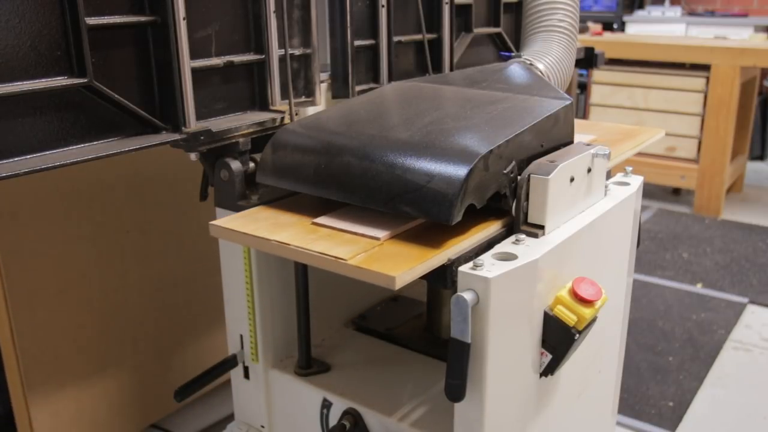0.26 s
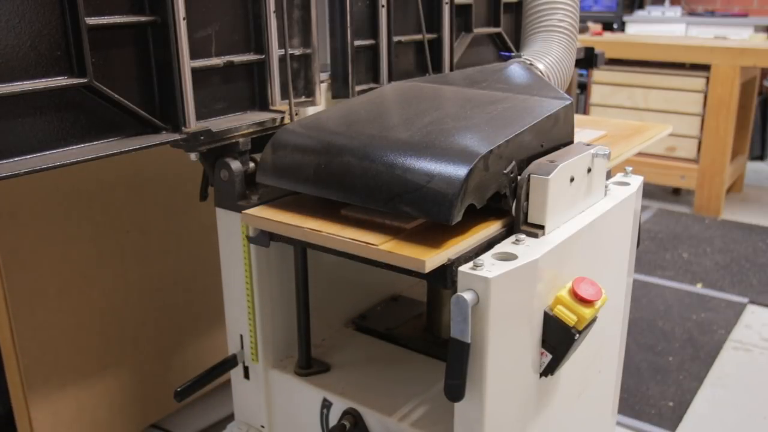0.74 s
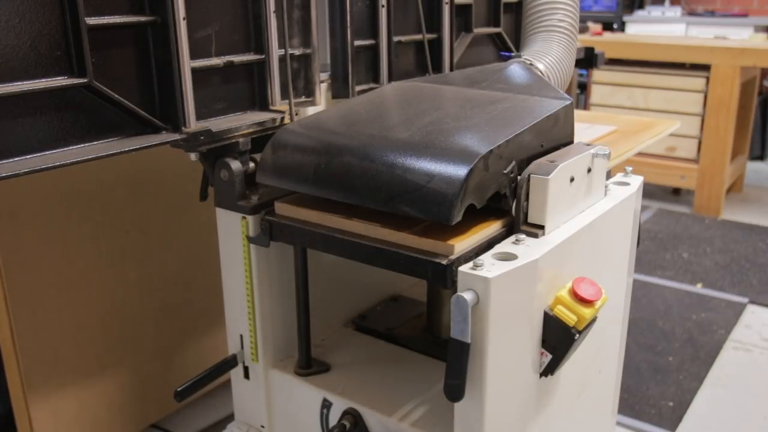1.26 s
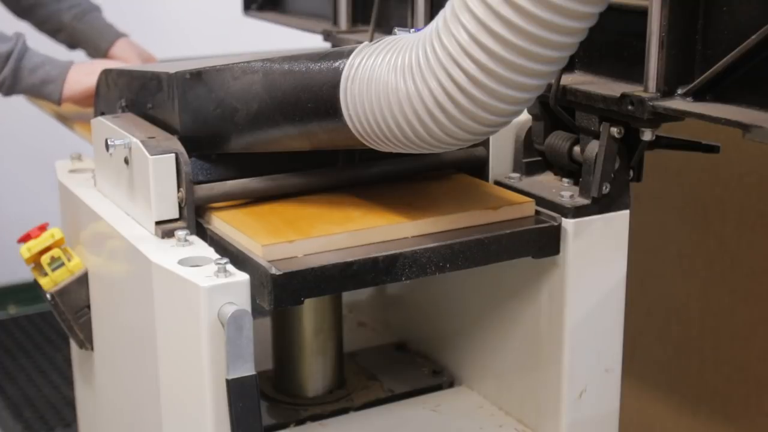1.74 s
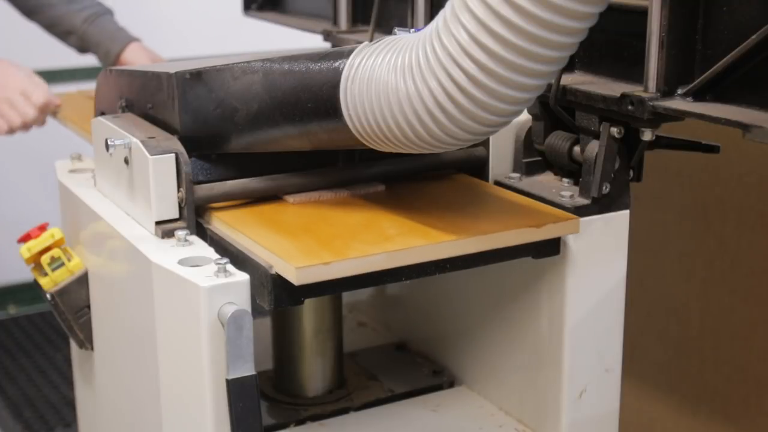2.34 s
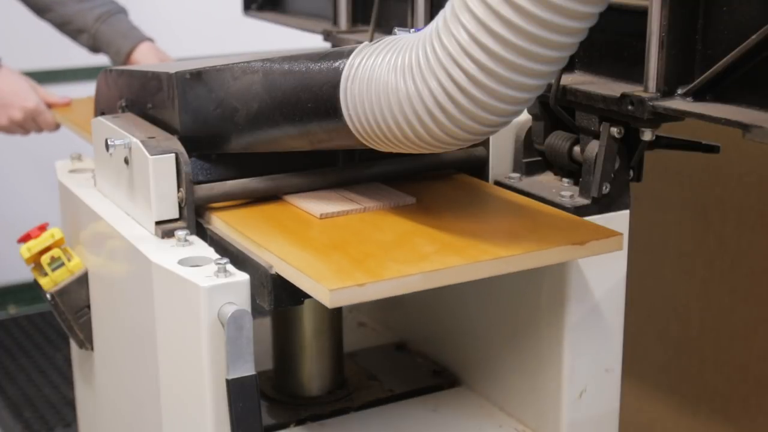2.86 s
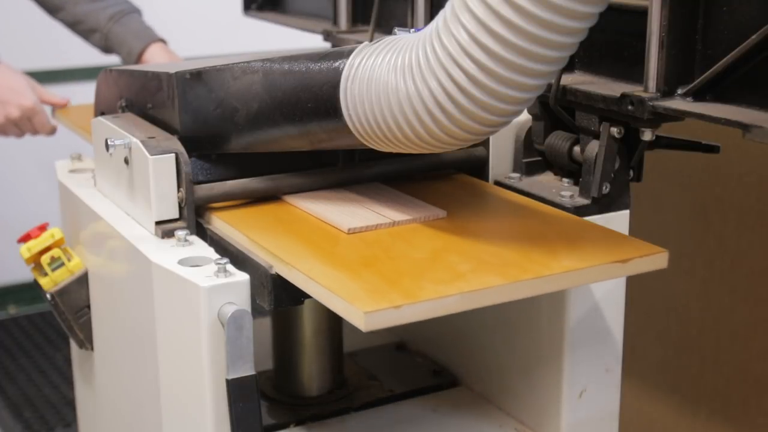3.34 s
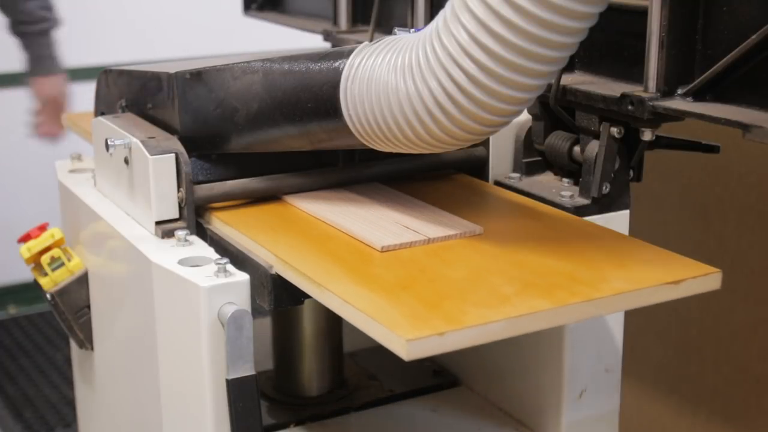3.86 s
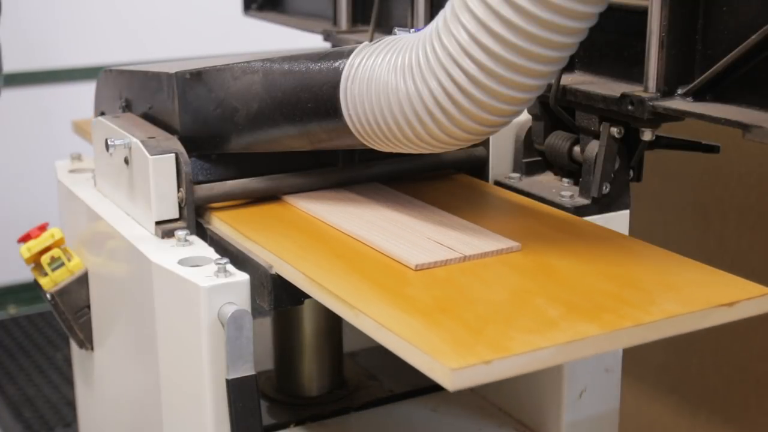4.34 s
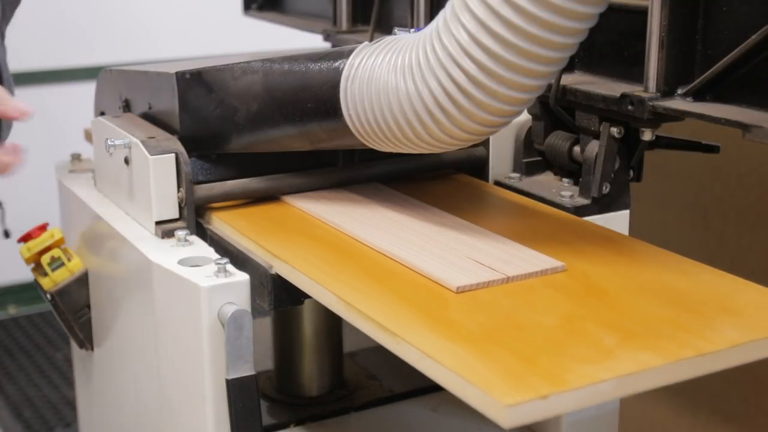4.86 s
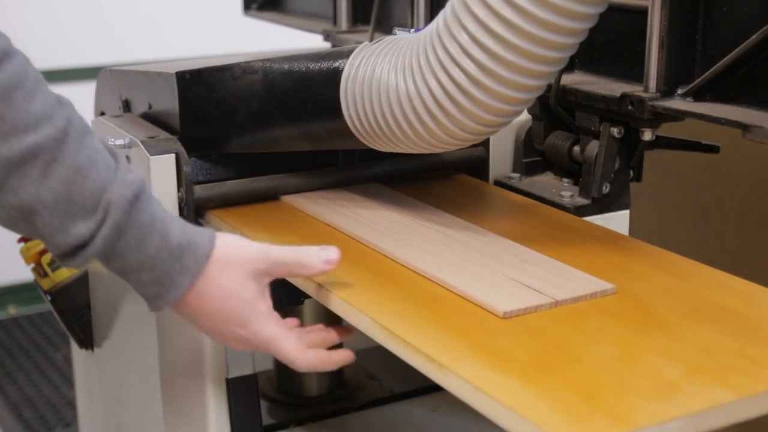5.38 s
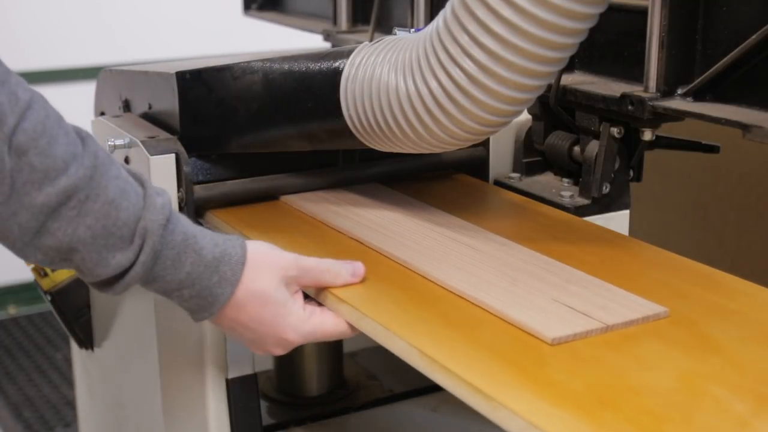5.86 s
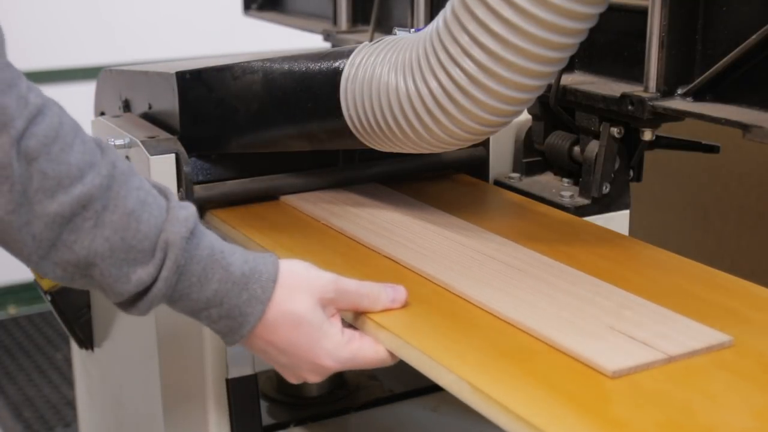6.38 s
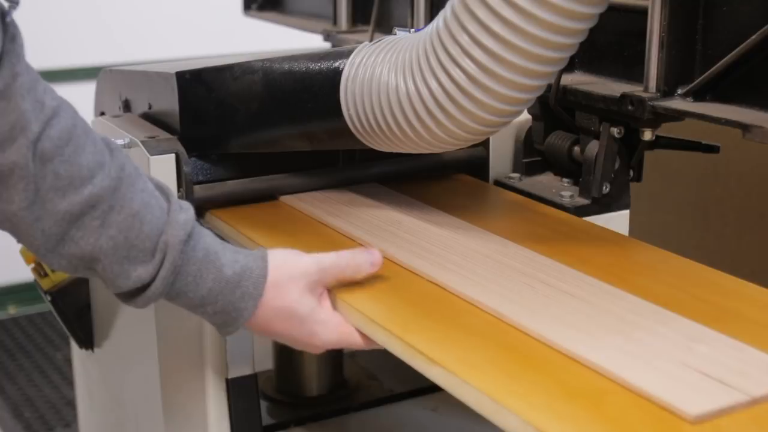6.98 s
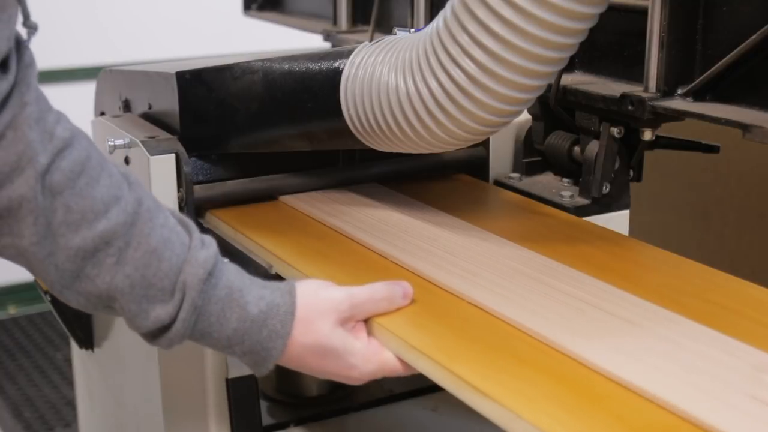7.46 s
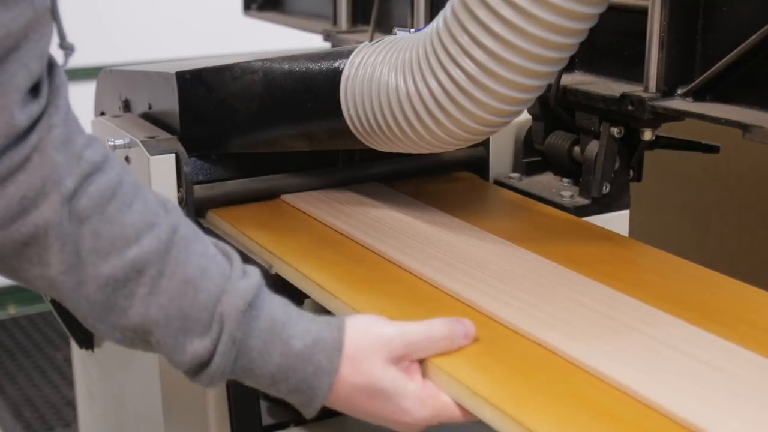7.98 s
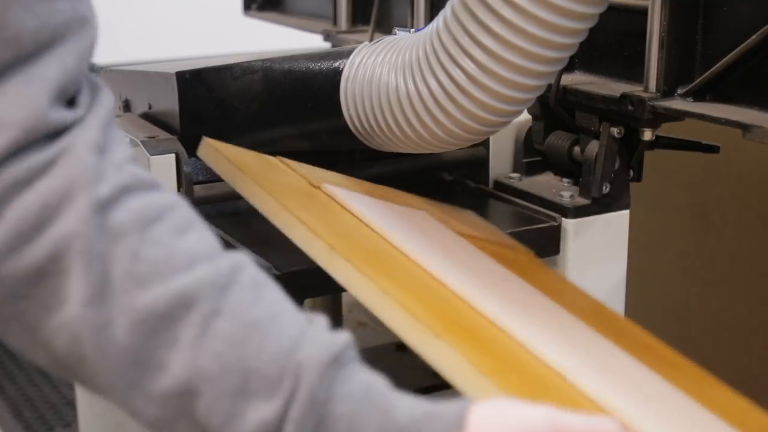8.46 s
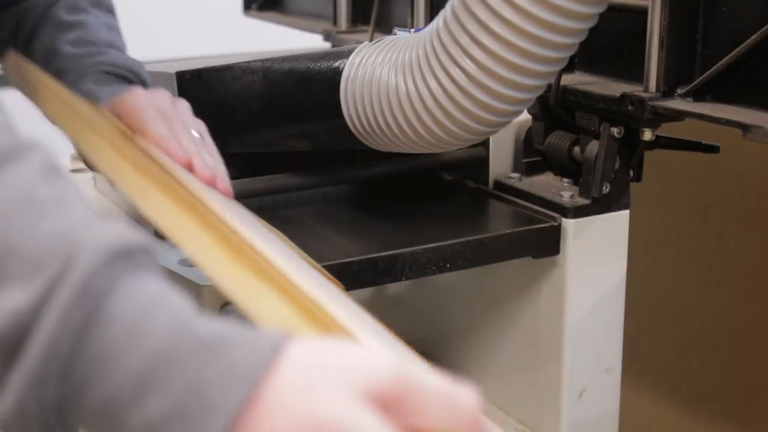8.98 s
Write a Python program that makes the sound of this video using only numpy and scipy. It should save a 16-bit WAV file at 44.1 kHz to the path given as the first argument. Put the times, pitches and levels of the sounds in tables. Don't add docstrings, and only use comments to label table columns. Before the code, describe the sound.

From the start a thickness planer is cutting, heard close at the infeed: a loud, dense buzz around 345 Hz with strong bright overtones, chip hiss and low motor rumble. At 1.5 s the position jumps to the outfeed with a faint thump; the tone turns thinner and sharper, and hiss brightens. A woody snap at 1.8 s marks the strip's nose catching under the roller. Until 6.8 s the whine holds nearly steady in pitch while individual overtones swell and fade. At 6.85 s the tail snaps free, fluttering, then squeals upward from 7.15 s. At 7.3 s cutting stops abruptly, leaving a short ring and room reverberation. Block and extractor fan hum slowly beat over suction air, sinking near 8.5 s and gradually growing louder until about 9.2 s. Soft board knocks land at 7.85, 8.15 and 8.3 s, with a tiny tick at 8.9 s.

```python
import sys
import numpy as np
from scipy import signal
from scipy.fft import rfft, irfft, next_fast_len
from scipy.io import wavfile
from scipy.ndimage import uniform_filter1d, map_coordinates

SR = 44100
rng = np.random.default_rng(int(sys.argv[2]) if len(sys.argv) > 2 else 0)


def unload_audio(sound):
    columns = np.transpose(np.atleast_2d(sound))
    steps = np.round(np.clip(columns, -1, 1) * 32767)
    wavfile.write(sys.argv[1], SR, steps.astype(np.int16))


def undo_db(level):
    steps = np.asarray(level, float) / 20
    return 10 ** steps


N = 406599

KNIVES, SHAFT_HZ = 4, 86.2
TOP_ORDER, STEP = 160, 1024
LEAVES_S = 7.3
# start_s, level_db
CUT_DEPTH = [(0, -3), (.8, -0.5), (1.49, -1.5), (2.2, -0.5), (3.3, -1), (4.8, 0), (5.7, -1), (6.2, 1),
             (7.1, -0.5), (7.28, 1.5)]
GRIP_STARTS = [
    0,
    1.5,
    1.79,
    2.05,
    2.65,
    4.4,
    6.85,
    7.14,
]


def along(points, hz):
    f, v = np.transpose(points)
    return np.interp(np.log(hz + 1), np.log(f + 1), v)


def curves(rows, s=None):
    at, *cols = np.transpose(rows)
    when = np.arange(N) / SR if s is None else s
    return [np.interp(when, at, c) for c in cols]


def unit(x):
    return x / np.sqrt(np.mean(np.abs(x) ** 2) + 1e-20)


def bump(x, centre, width):
    return np.exp(-((x - centre) / width) ** 2)


def filtered(x, response):
    m = next_fast_len(N + SR // 2)
    return irfft(rfft(x, m) * response(np.fft.rfftfreq(m, 1 / SR)), m)[..., :N]


def rush(spectrum, patchy_db):
    z = signal.stft(rng.standard_normal(N), nperseg=512)[2]
    field = uniform_filter1d(uniform_filter1d(rng.standard_normal(z.shape), 6, 0), 12, 1)
    x = signal.istft(z * undo_db(patchy_db * unit(field)), nperseg=512)[1][:N]
    return unit(filtered(x, lambda hz: undo_db(along(spectrum, hz))))


def tone(turns, db, unsteady_db):
    sway = map_coordinates(rng.standard_normal(80), [np.linspace(0, 79, N)], order=1)
    return np.sqrt(2) * undo_db(db + unsteady_db * sway) * np.sin(2 * np.pi * turns)


def cutting(s):
    let_go_s = .035
    return np.clip((LEAVES_S + let_go_s - s) / let_go_s, 0, 1) ** 1.6


def shaft():
    # start_s, rate_hz
    loaded = [(0, 342.9), (1.495, 342.7), (1.5, 344.5), (2.3, 344.3), (2.9, 345.0), (7.0, 345.4),
              (7.2, 345.9), (7.3, 348)]
    # start_s, rate_hz
    unloaded = [(7.45, 348.2), (7.7, 349.1), (7.95, 349.75), (8.2, 349.95), (9.22, 350.0)]
    # tug_rate_hz, swing_hz of the knife rate
    tugs = [(3.1, .2), (5.3, .27), (8.9, .3), (14.3, .33)]
    now = np.arange(N) / SR
    tug = sum(swing * np.sin(2 * np.pi * rate * now + rate) for rate, swing in tugs) * cutting(now)
    return np.cumsum(curves(loaded + unloaded)[0] + tug) / (KNIVES * SR)


def strip_levels(s, order, stage):
    # knife_multiple, level_db
    infeed = [(1, 7), (2, 1.5), (3, -1.5), (4, 4.5), (5, 3), (6, -2), (7, -2), (8, -2.5), (9, 1), (10, 3.5),
              (11, -4.5), (12, -29), (13, -12.5), (14, -26), (15, -5.5), (16, -12), (17, -33), (18, -18),
              (19, -10), (20, -12)]
    nose_free = [(1, -1), (2, -9.5), (3, -17.5), (4, -18), (5, 2.5), (6, 6), (7, -8), (8, -3.5), (9, -1),
                 (10, -2.5), (11, -4), (12, -4), (13, -11), (14, -15)]
    nose_caught = [(1, 0), (2, -34), (3, -9.5), (4, -9), (5, 1), (6, -6.5), (7, -5), (8, -5), (9, -1),
                   (10, -1.5), (11, 0), (12, -13), (13, -6.5), (14, -6.5), (15, -16), (16, -15)]
    nose_pressed = [(1, 0), (2, -14), (3, -10), (4, -8.5), (5, 4.5), (6, -8), (7, 5), (8, -10), (9, -1.5),
                    (10, 0.5), (11, -5), (12, -6), (13, -5), (14, -10), (15, 0), (16, -7)]
    held = [(1, 0), (2, -17.5), (3, -1.5), (4, -3), (5, -7), (6, -13), (7, -8), (8, -3), (9, -8), (10, 4.5),
            (11, 0.5), (12, -6), (13, -4), (14, -13), (15, -8), (16, -15), (17, -14), (18, -5), (19, -11.5),
            (20, -11), (21, -7), (22, -15), (23, -9.5), (24, -14), (25, -16.5), (26, -34), (27, -15.5),
            (28, -24), (29, -19), (30, -40)]
    held_late = [(1, 0), (2, -12.5), (3, -0.5), (4, -3.5), (5, -4), (6, -9), (7, -10.5), (8, 1.5), (9, -13),
                 (10, 4), (11, 4), (12, -5), (13, -10.5), (14, -19), (15, -14), (16, -21), (17, -24),
                 (18, -6.5), (19, -19), (20, -13), (21, -26), (22, -34), (23, -15), (24, -27)]
    tail_free = [(1, -5), (2, 1.5), (3, -1), (4, -27), (5, 3), (6, -10), (7, -3), (8, 6), (9, -8), (10, -1),
                 (11, -4), (12, -6), (13, -11), (14, -11)]
    tail_last = [(1, -14), (2, -5), (3, -2), (4, -5.5), (5, -0.5), (6, -10), (7, -5), (8, -3.5), (9, -1.5),
                 (10, -3), (11, -6), (12, -0.5), (13, -7), (14, -5), (15, -5), (16, -7), (17, -6),
                 (18, -15)]
    grip_db = [-2.5, 2.5, 2.5, 0.5, -1, -0.5, -1, 2.5]
    # pitch_hz, level_db
    uneven = [(60, -76), (260, -12.5), (430, -17.5), (520, -20.5), (900, -38), (1500, -18.5), (3000, -20),
              (4500, -14.5), (6500, -15.5), (9000, -19), (12000, -31.5), (14000, -29)]
    uneven_db = [-3.5, -4.5, -2.5, 1, 1, .5, -1, -9]
    order_bias_db = [0, 3.5, -4, -1]
    # shaft_order, extra_db
    hood_orders = [(13, 10), (14, 13.5), (17, 5.5), (18, 17), (21, -1), (22, 9.5), (25, 8), (15, 0),
                   (31, 6.5), (33, 5.5), (34, -12), (35, 13), (37, 1.5), (49, -7), (63, -13), (65, 2),
                   (74.06, 6.5), (42, 3), (51, -3), (77, 7)]
    base = along(uneven, order * SHAFT_HZ) + np.take(order_bias_db, order % KNIVES)
    base = base + rng.normal(0, 1.8, TOP_ORDER)
    db = base + np.take(uneven_db, stage)[:, None]
    for k, extra_db in hood_orders:
        db[:, round(k) - 1] += extra_db
    grips = [infeed, nose_free, nose_caught, nose_pressed, held, held_late, tail_free, tail_last]
    for k, table in enumerate(grips):
        multiple, level = np.transpose(table + held[len(table):])
        column = KNIVES * np.round(multiple).astype(int) - 1
        db[np.ix_(stage == k, column)] = level + grip_db[k]
    span = (stage == 4) | (stage == 5)
    db[span] = uniform_filter1d(db[span], SR // STEP, 0)
    db[s > 1.85] = uniform_filter1d(db[s > 1.85], size=5, axis=0, mode='nearest')
    return db


def place_levels(order, stage):
    # shaft_order, extra_db
    infeed_orders = [(3, 6), (9, 4), (15, -4), (17, 8), (19, -4), (21, 16), (22, -8), (23, 6), (25, -12),
                     (27, -5), (31, -9), (34, 4), (43, -6), (52, 4), (67, -6), (76, -3), (77, 6), (81, 4),
                     (84, -6), (92, -10)]
    # shaft_order, extra_db
    outfeed_orders = [(3, -2), (5, 2), (15, 6), (21, 4), (26, 5), (29, 3), (31, 3), (33, 2), (34, 8),
                      (37, 4), (43, 3), (47, 3), (51, 3), (52, 4), (54, -4), (55, 2), (56, 3), (58, -4),
                      (61, 2), (67, -6), (69, -3), (75, -2), (81, 3), (89, 3), (93, 3), (97, -3)]
    db = np.zeros((len(stage), len(order)))
    for here, favoured in ((stage == 0, infeed_orders), (stage > 0, outfeed_orders)):
        k, extra_db = np.transpose(favoured)
        db[np.ix_(here, k - 1)] += extra_db
    return db


def strip_modes(s, order, stage):
    # centre_s, shaft_order, level_db, half_length_s
    passing = [(1.53, 16, 12, .04), (1.53, 12, 6, .04), (1.53, 14, 6, .04), (1.6, 8, -12, .02),
               (1.1, 28, -5, .4), (1.75, 36, -4, .15), (2.4, 8, 5, .15), (4, 8, 6, .12), (4.5, 8, 4, .1),
               (5.25, 8, -6, .15), (6.79, 8, -8, .05), (3.4, 12, -5, .2), (4.9, 12, -3, .5),
               (6.9, 12, -4, .1), (2.8, 28, 12, .13), (3.6, 28, 4, .2), (4.4, 28, -6, .2),
               (4.3, 32, -4, .4), (5.2, 32, -3, .25), (6.72, 32, -7, .1), (2.35, 36, -8, .15),
               (5.6, 36, 4, .35), (4.7, 44, -3.5, .6), (5.8, 44, 10, .13), (6.45, 44, -9, .35),
               (3.55, 48, -7, .15), (4.6, 48, -9, .2), (2.35, 60, -10, .3), (3.85, 60, -5, .3),
               (4.9, 64, 9, .15), (5.7, 80, -6, .5), (2.2, 84, -9, .45), (2.2, 92, -7, .35),
               (5.65, 92, -7, .3), (6.25, 72, -4, .3), (7.1, 72, 8, .1), (5.7, 17, -12, 1.1),
               (5.3, 3, -7, .4), (7, 3, -12, .35), (5.3, 88, 6, .3), (6.4, 84, 5, .3), (6.7, 56, 5, .15),
               (4.3, 16, 4, .12), (5.1, 16, -5, .1), (7.05, 8, -6, .2), (7, 28, -3, .15),
               (5.5, 40, -2, 1.2), (2.4, 20, -2.5, .5), (1.77, 24, -5, .06), (5, 72, 2.5, 1.3),
               (5, 52, 1.5, 1.3), (6.75, 64, -7, .12), (7.27, 16, 3, .04), (7.2, 44, 4, .05),
               (1.735, 24, 9, .04), (1.6, 16, 5, .15), (1.7, 28, 5, .25), (1.62, 72, 2, .15),
            (2.85, 28, 7, .12), (2.55, 20, -2, .15), (3.25, 52, 2.5, .2), (3.9, 52, 2, .3),
            (4.35, 52, 4, .15), (6.1, 52, 4, .7), (4.9, 44, -3.5, .5), (5.55, 40, -3, .2),
            (6.15, 40, -4, .15), (7.12, 8, -5, .12), (7.06, 12, -4, .03), (7.13, 24, 6, .09),
            (7.16, 16, 4, .04), (7.31, 12, -13, .035), (7.32, 20, -8, .025), (7.32, 36, -7, .02),
            (7.32, 44, -7, .03), (7.32, 48, -11, .04), (7.32, 56, -6, .04), (1.81, 20, -6, .02),
            (2.1, 20, -3, .15), (5.4, 28, -3.5, .3), (5.85, 64, -7, .15), (3.8, 64, -6, .2),
            (6.85, 64, -5, .25), (.1, 16, 4, .13)]
    # centre_s, knife_multiple, level_db, half_length_s
    swells = [(1.12, 3, 5.5, 0.34), (1.15, 5, -14, 0.27), (1.3, 6, 3, 0.2), (1.76, 5, 9, 0.019),
              (2.114, 6, 13.5, 0.11), (2.415, 5, 8, 0.11), (2.57, 7, -41, 0.27), (2.79, 9, 10, 0.27),
              (3.07, 18, 9, 0.49), (3.2, 8, 7, 0.26), (3.5, 4, 4, 0.16), (3.36, 5, 9.5, 0.29),
              (4.2, 4, -9, 0.23), (4.69, 5, 6, 0.62), (5.3, 7, 12, 0.85), (5.84, 11, -22, 0.3),
              (6, 13, 5, 0.27), (6.25, 12, 2, 0.4), (6.5, 6, 10, 0.44), (6.6, 4, -19, 0.18),
              (7.28, 4, 2, 0.035), (7.275, 6, 9, 0.024), (6.75, 18, -17, 0.36), (6.92, 7, 11.5, 0.11),
              (1.888, 8, 10.5, 0.049), (2, 18, -2, 0.89), (4.26, 3, -5, 0.88), (3.93, 5, 10, 0.063),
              (1.685, 6, -8, 0.049), (6.2, 5, -17, 0.053)]
    hz = order * SHAFT_HZ
    flutter = (order % KNIVES > 0) * 8 * bump(hz, 3500, 750)
    db = np.outer(bump(s, 7.185, .055), flutter)
    for at, k, swell_db, half in passing:
        db[:, k - 1] += swell_db * bump(s, at, half)
    freed = stage == 6
    db[freed] += np.outer(np.clip(s[freed] - 6.98, 0, 1), -60 * bump(hz, 2600, 400))
    last = stage == len(GRIP_STARTS) - 1
    squeal_start_hz, squeal_rise_hz_per_s, squeal_width_hz, squeal_db = 3200, 5500, 750, 6
    squeal_hz = squeal_start_hz + squeal_rise_hz_per_s * (s[last, None] - GRIP_STARTS[-1])
    db[last] += squeal_db * (bump(hz, squeal_hz, squeal_width_hz) - .5)
    for at, multiple, swell_db, half in swells:
        db[:, KNIVES * multiple - 1] += swell_db * bump(s, at, half)
    return db


def sound_paths(order, stage, wander, drift_s, knife_drift, uneven_drift):
    blow_share = [.3, .2, .5, .4, .4, .4, .3, -.75]
    blow_hz, blow_width_hz = 3300, 3000
    size = max(int(drift_s * SR / STEP), 1)
    wander = unit(uniform_filter1d(uniform_filter1d(wander, size, 0), size, 0))
    push = uniform_filter1d(np.clip(np.take(blow_share, stage), -1, 1), size=3)
    blow = push[:, None] * bump(order * SHAFT_HZ, blow_hz, blow_width_hz)
    ringing = 1 - np.abs(blow)
    knife_drifts = knife_drift * np.sqrt(np.minimum(order / 40, 1))
    drift = np.where(order % KNIVES, uneven_drift, knife_drifts) * ringing
    way = ringing * np.exp(2j * np.pi * rng.random(TOP_ORDER)) + blow
    way = (way / np.abs(way) + drift * wander) / np.sqrt(1 + drift ** 2)
    steady = KNIVES * np.array([1, 2, 5, 6, 8, 10, 11, 13, 18]) - 1
    way[:, steady] /= np.abs(way[:, steady])
    return way


def partials(s):
    # start_s, level_db
    hum = [(1.5, -40), (1.9, -40), (2.35, -35.5), (2.95, -41), (4.9, -42), (5.35, -45.5), (6.1, -42),
           (6.75, -43.5), (7.25, -60.5)]
    tone_db, flicker_db = -47.5, 1
    order = np.arange(1, TOP_ORDER + 1)
    stage = np.searchsorted(GRIP_STARTS, s, side="right") - 1
    db = strip_levels(s, order, stage) + place_levels(order, stage) + strip_modes(s, order, stage)
    db += curves(CUT_DEPTH, s)[0][:, None] + tone_db
    db[stage > 0, KNIVES - 1] = curves(hum, s)[0][stage > 0]
    wander = rng.standard_normal(db.shape) + 1j * rng.standard_normal(db.shape)
    db += flicker_db * unit(uniform_filter1d(wander.real, size=2, axis=0))
    return undo_db(db) * sound_paths(order, stage, wander, drift_s=.24, knife_drift=.38, uneven_drift=1.1)


def knives(turns):
    size = 4096
    s = np.arange(N // STEP + 2) * STEP / SR
    wave = irfft(np.pad(partials(s), ((0, 0), (1, 0))), size) * size / np.sqrt(2)
    wave = np.hstack([wave, wave[:, :1]])
    place = [np.arange(N) / STEP, turns % 1 * size]
    return cutting(np.arange(N) / SR) * map_coordinates(wave, place, order=1)


def chips(turns):
    # pitch_hz, density_db
    near_spectrum = [(290, -51), (500, -8.5), (682, -16), (745, -11), (1030, -12), (1270, -13), (1380, -16),
                     (1630, -11.5), (3500, -8), (9840, -12.5), (17000, -29)]
    # pitch_hz, density_db
    far_spectrum = [(300, -30), (600, -8), (1035, -4), (1725, -3), (2400, -1.5), (3800, -.5), (5200, -2),
                    (6500, 0), (7900, -.5), (8600, -3), (10000, -3.5), (11400, -7.5), (13500, -11.5),
                    (17000, -20)]
    now = np.arange(N) / SR
    hiss_db = -47.4 + 0.78 * curves(CUT_DEPTH)[0]
    spurt = 1 + 0.5 * np.cos(2 * np.pi * KNIVES * turns)
    spurt += 0.2 * np.cos(2 * np.pi * turns) + 0.14 * np.cos(4 * np.pi * turns)
    change_s, spill_db, spill_t60_s = .1, -2, 0.43
    near = np.clip(1 - (now - GRIP_STARTS[1]) / change_s, 0, 1) ** 2
    spill = undo_db(spill_db - 60 * np.abs(now - LEAVES_S) / spill_t60_s)
    far_db = 3.6 - .5 * (now < GRIP_STARTS[2])
    hiss = near * undo_db(7) * rush(near_spectrum, patchy_db=0.0)
    hiss += np.sqrt(1 - near ** 2) * undo_db(far_db) * rush(far_spectrum, patchy_db=2.5)
    return undo_db(hiss_db) * unit(spurt) * hiss * np.maximum(cutting(now), spill)


def feed_gears(turns):
    # shaft_order, level_db
    gears = [(4.765, -54.5), (4.74, -81)]
    loaded = np.clip((LEAVES_S - np.arange(N) / SR) / .06, 0, 1)
    return sum(tone(order * turns, db, unsteady_db=0.5) for order, db in gears) * loaded


def resonance(f, hz, width_hz):
    return 1j * f * width_hz / (hz * hz - f * f + 1j * f * width_hz)


def knocks():
    # start_s, peak_db, t60_s, low_share_db, bright_share_db
    contacts = [
        (1.4977, -48, 0.03, 0, -10),
        (1.789, -36, 0.028, -14, -18),
        (6.842, -38, 0.08, -5, -2),
        (7.838, -49, 0.045, -4, -16),
        (8.1575, -41, 0.026, 5, -40),
        (8.325, -39.5, 0.14, 5, -26),
    ]
    # pitch_hz, width_hz, level_db
    wood_modes = [(1190, 500, -9), (1880, 1100, -2.5), (2620, 750, -2), (3200, 600, -2)]
    rise_per_s, wood_top_hz = 1.5, 3500
    bursts, t = np.zeros((3, N + SR)), np.arange(SR // 8) / SR
    for s, db, t60, low_db, bright_db in contacts:
        rise = 1 - np.exp(-t / (rise_per_s * t60 ** 2))
        burst = undo_db(db + 7.0 - 60 * t / t60) * rise * rng.standard_normal(len(t))
        bursts[:, round(s * SR):][:, :len(t)] += undo_db([[0], [low_db], [bright_db]]) * burst

    def bodies(f):
        wood = sum((-1) ** k * undo_db(db) * resonance(f, hz, width)
                   for k, (hz, width, db) in enumerate(wood_modes))
        wood = wood / (1 - (f / wood_top_hz) ** 2 + 1.4j * f / wood_top_hz) ** 2
        bed = resonance(f, 410, 400) ** 2
        hood = resonance(f, 4100, 3400) ** 2
        return np.array([wood, bed, hood])

    return undo_db(14.5) * filtered(bursts[:, :N], bodies).sum(0)


def rings():
    # start_s, pitch_hz, peak_db, t60_s
    struck = [(1.786, 2080, -29, 0.056), (1.79, 2800, -29, .04), (1.788, 1160, -36, .04),
              (6.847, 2550, -28, .04), (6.846, 3600, -33, 0.038), (6.857, 2900, -30, .04),
              (6.867, 2250, -31, .05), (6.889, 2600, -39, 0.072), (8.9, 2500, -34, .018),
              (8.1575, 2900, -38, .016), (8.158, 1800, -39, .025), (7.3, 347.5, -41, .6),
              (7.305, 1393, -44, .5), (7.305, 2786, -45, .3), (7.335, 3134, -46, .2),
              (7.335, 3482, -48, 0.18), (7.32, 5570, -51, .3)]
    out, t = np.zeros(N + SR), np.arange(SR // 2) / SR
    for s, hz, db, t60 in struck:
        rise = (1 - np.exp(-t / (.05 * t60))) ** 2
        out[round(s * SR):][:len(t)] += undo_db(db + 3 - 60 * t / t60) * rise * np.sin(2 * np.pi * hz * t)
    return out[:N]


def idle(turns):
    # start_s, rumble_db
    gain = [(0, -71), (1.49, -67.5), (1.51, -72.5), (2.5, -70.5), (6.9, -68.5), (7.28, -76.5), (7.34, -71),
            (7.6, -68.5), (8.1, -62.5), (8.85, -54), (9.22, -51)]
    # shaft_order, level_db over rumble
    block_tones = [(1, -20), (4, 13.5), (5, -30), (8, 1.5), (12, -7.5), (16, -5.5), (28, -10)]
    # blade_multiple, level_db over rumble
    fan_tones = [(1, 12.5), (2, 9), (3, -4)]
    # start_s, level_db, lead_s
    fan_view = [
        (0, -1.5, 0.0062),
        (1.502, -15, 0),
        (7.248, -2.5, 0),
    ]
    # pitch_hz, level_db over rumble
    motor_tones = [(106.4, -7), (100.2, -8), (400.9, -5), (53.1, -15), (2044, -20), (2842, -21),
                   (3828, -22)]
    # pitch_hz, density_db
    rumble_spectrum = [(18, -62), (30, -23), (91, -16.5), (298, -3), (345, -7.5), (400, -5.5), (473, -3),
                       (579, -9.5), (697, -6), (887, -12.5), (1110, -10.5), (2080, -21), (2240, -64),
                       (2500, -23), (3250, -70), (5500, -120)]
    # pitch_hz, density_db
    air_spectrum = [(880, -26), (1500, -15), (2100, -4), (3120, -8.5), (3700, -8), (5500, -15), (7240, -16),
                    (12700, -28), (17000, -42)]
    fan_hz, cancel_s = 345.3, 8.52
    air_over_db, shut_db, opens_s, opening_s = 4, -2.5, 7.6, 0.38
    rumble_db, now = curves(gain)[0], np.arange(N) / SR
    air_db = rumble_db + air_over_db + shut_db * np.clip(1 - (now - opens_s) / opening_s, 0, 1)
    since, view_db, lead = np.transpose(fan_view)
    view = np.searchsorted(since, now, side="right") - 1
    t = now - cancel_s
    turns = turns - turns[round(cancel_s * SR)]
    block = sum(tone(order * turns + .5, db, unsteady_db=1.2) for order, db in block_tones)
    block = block * np.clip((now - since[-1]) / .06, 0, 1)
    fan = sum(tone(k * fan_hz * (t + lead[view]), db, unsteady_db=0.6) for k, db in fan_tones)
    fan = undo_db(view_db[view]) * fan
    motors = sum(tone(hz * t, db, unsteady_db=7.5) for hz, db in motor_tones)
    rumble = undo_db(14.5) * rush(rumble_spectrum, patchy_db=1.0)
    air = undo_db(air_db) * rush(air_spectrum, patchy_db=1.5) * (now > LEAVES_S)
    return undo_db(rumble_db) * (block + fan + motors + rumble) + air


def shop(x):
    # pitch_hz, t60_s
    decay = [(200, 0.79), (1000, 0.86), (4000, 0.48), (12000, 0.42)]
    hz, t, z = signal.stft(rng.standard_normal(SR * 3 // 4), SR, nperseg=256)
    tail = signal.istft(z * undo_db(-60 * t / along(decay, hz)[:, None]), SR, nperseg=256)[1]
    return signal.fftconvolve(np.pad(x, (500, 0)), tail / np.linalg.norm(tail))[:N]


def scene():
    turns = shaft()
    work = knives(turns) + chips(turns) + feed_gears(turns) + knocks()
    room_db = -11
    return (work + undo_db(room_db) * shop(work) + rings() + idle(turns))[None]


def roll_off(x):
    return signal.sosfilt(signal.butter(12, 17185, fs=SR, output="sos"), x)


def record(dry):
    # pitch_hz, density_db
    preamp = [(300, -20), (3000, -2), (9000, 3), (14000, -6), (17000, -11)]
    thump = undo_db(-38) * bump(np.arange(N) / SR, 1.496, 0.00071)
    heard = filtered(dry + thump, lambda f: (1j * f / (1j * f + 40)) ** 2)
    hiss = undo_db(-66) * rush(preamp, patchy_db=.5)
    return roll_off(heard + hiss)


dry = scene()
out = record(dry)
unload_audio(out)
```